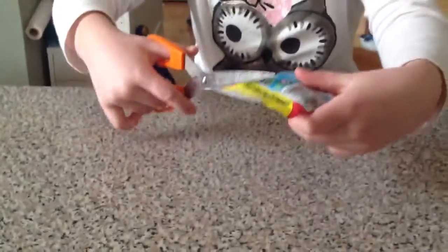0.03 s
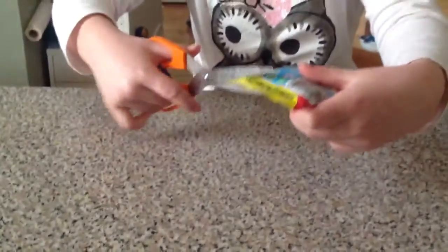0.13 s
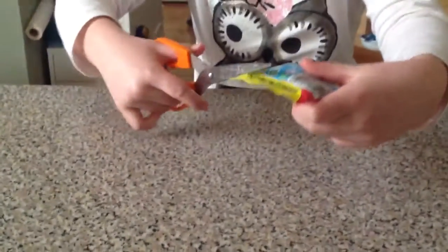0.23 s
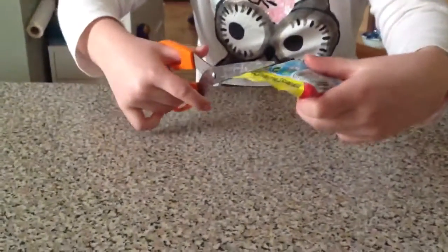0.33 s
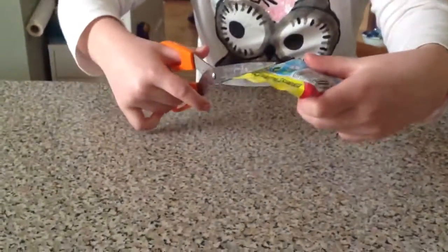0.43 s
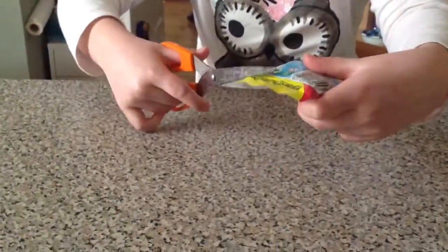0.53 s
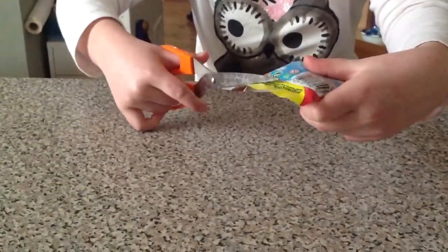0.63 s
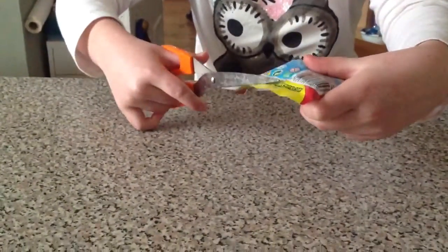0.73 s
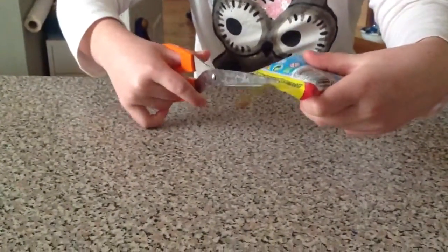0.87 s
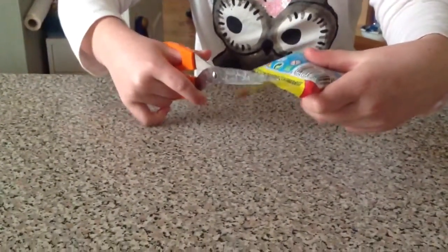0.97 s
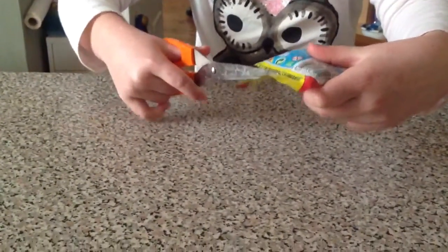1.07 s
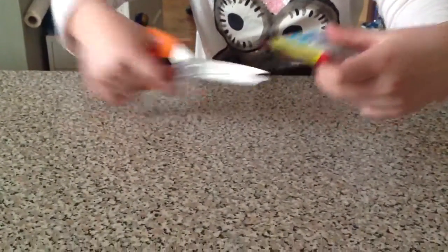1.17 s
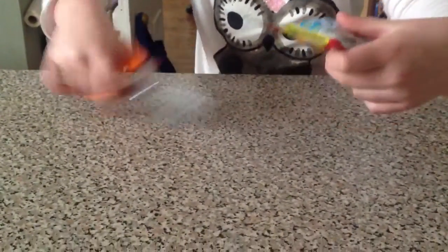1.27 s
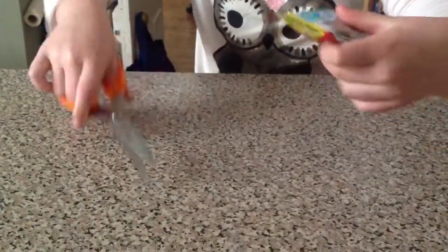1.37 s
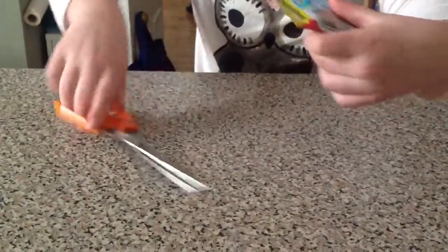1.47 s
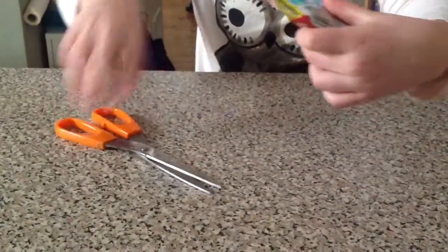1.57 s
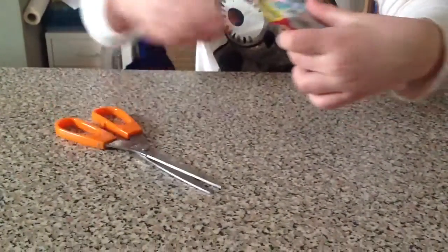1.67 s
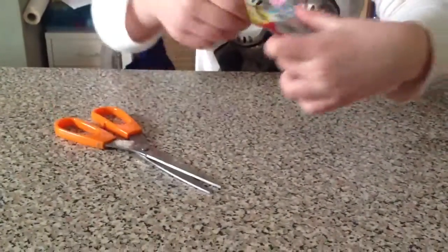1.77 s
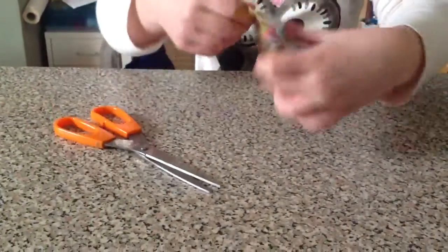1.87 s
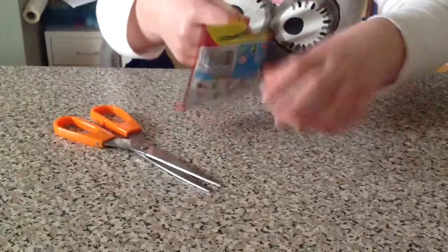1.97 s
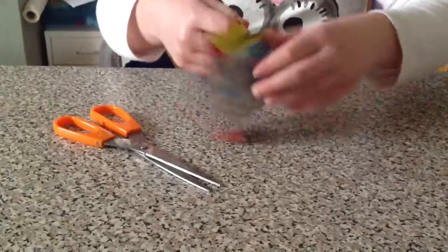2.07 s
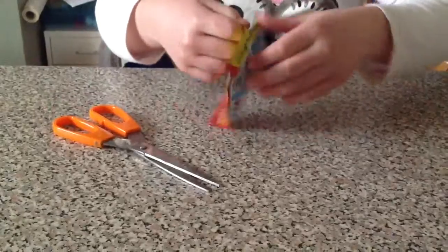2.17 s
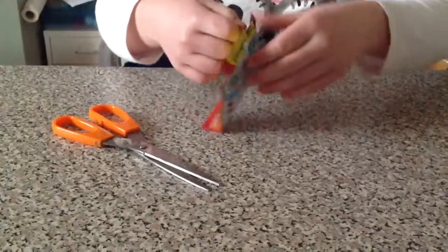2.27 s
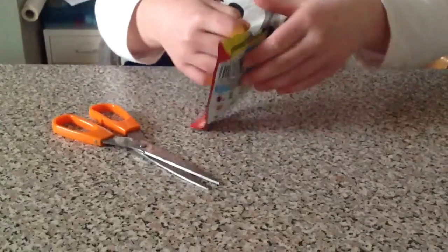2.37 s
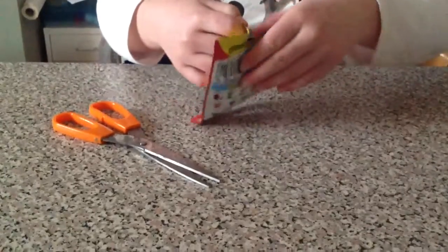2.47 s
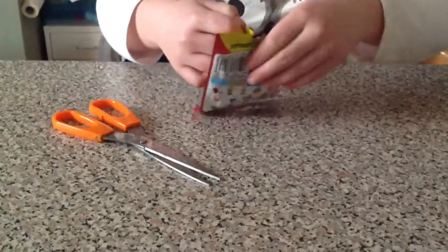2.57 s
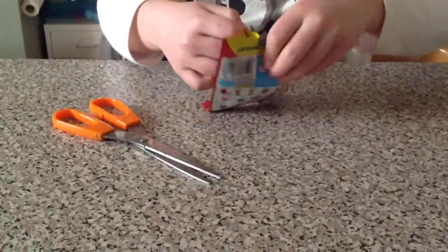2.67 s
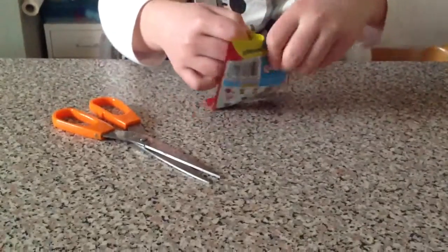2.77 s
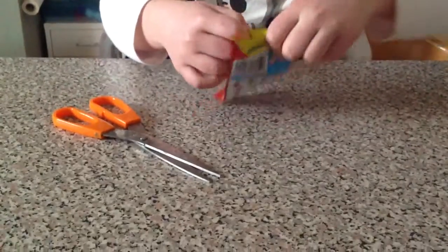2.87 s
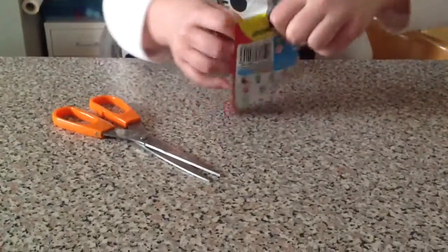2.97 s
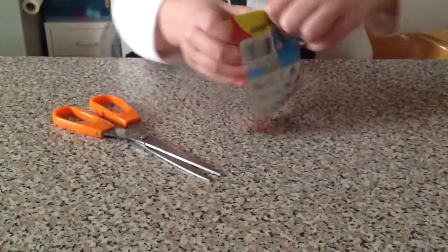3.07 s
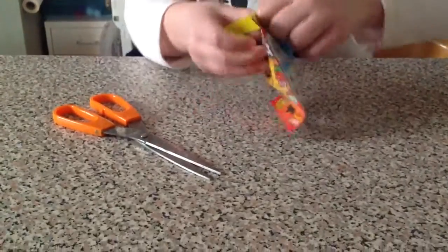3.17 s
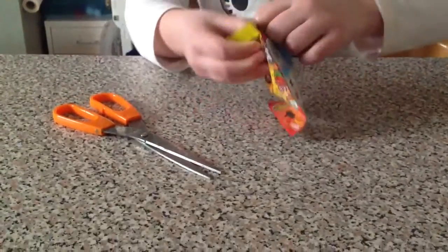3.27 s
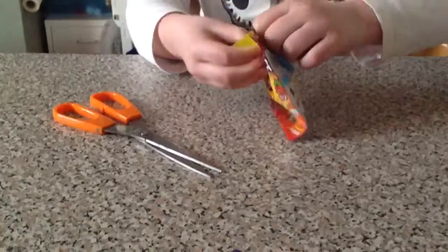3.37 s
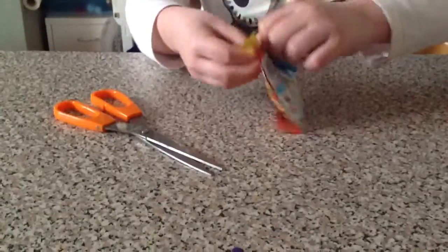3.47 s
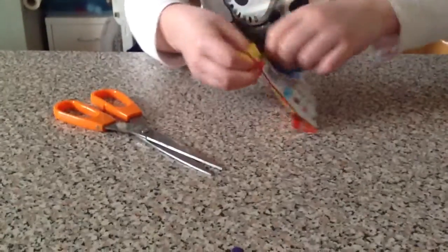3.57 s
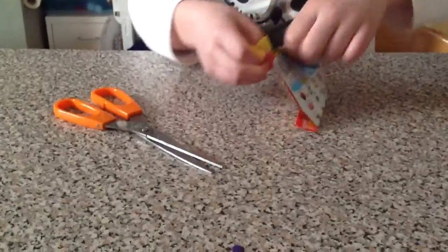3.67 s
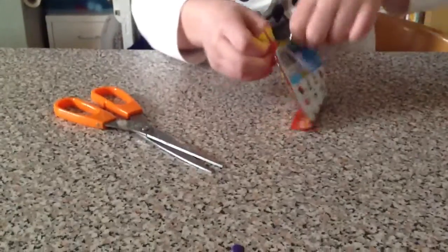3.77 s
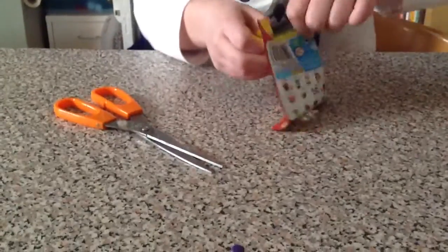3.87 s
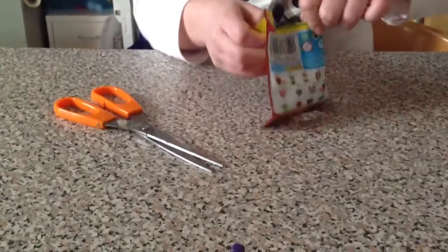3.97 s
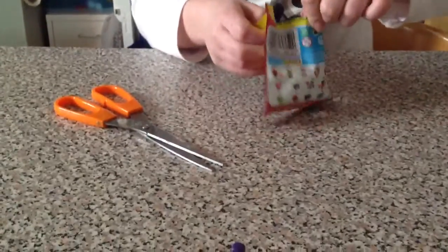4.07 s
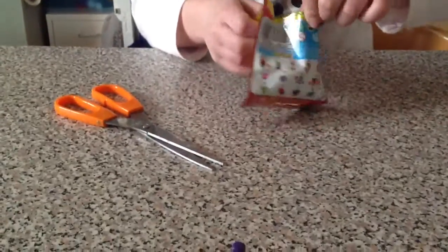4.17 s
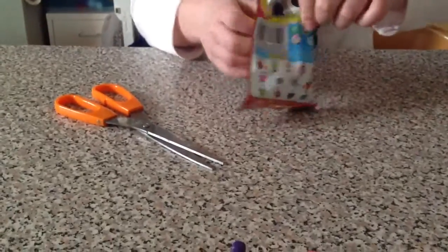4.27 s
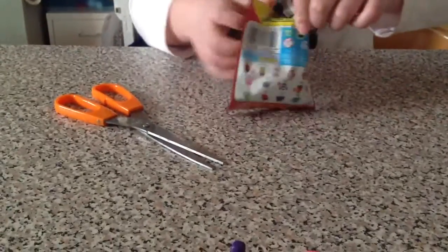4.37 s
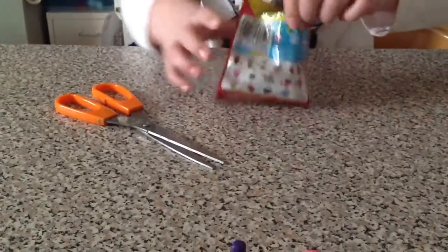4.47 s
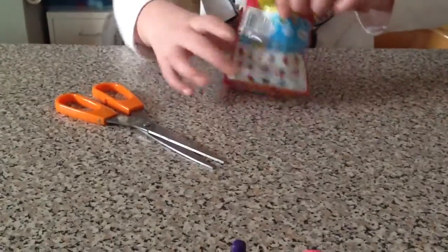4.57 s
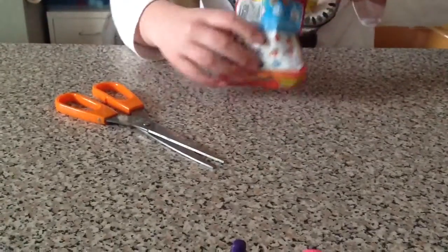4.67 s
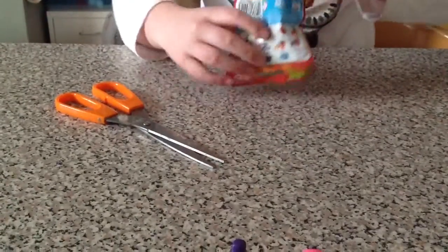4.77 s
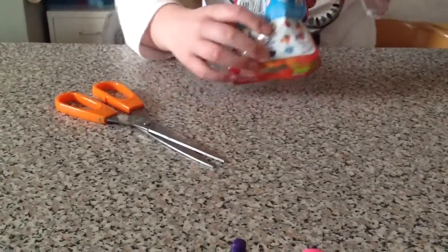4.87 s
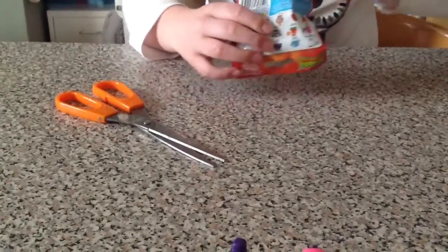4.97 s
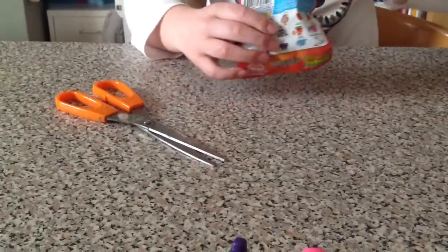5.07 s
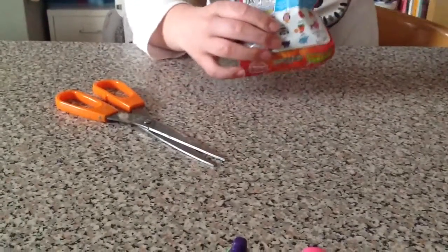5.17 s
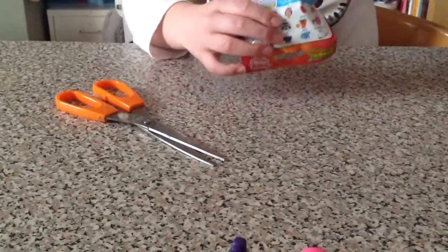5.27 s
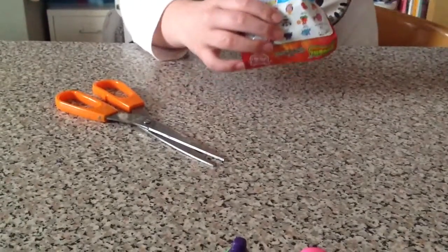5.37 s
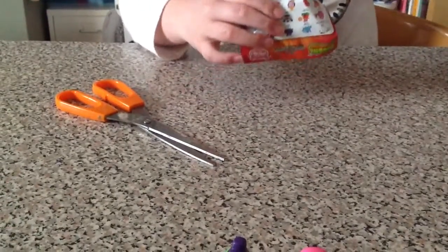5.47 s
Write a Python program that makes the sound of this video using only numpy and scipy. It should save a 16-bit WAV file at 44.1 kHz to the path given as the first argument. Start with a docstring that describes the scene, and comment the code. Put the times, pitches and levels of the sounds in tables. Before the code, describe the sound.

Close up in a hard-walled kitchen, scissor blades bite a small foil packet with irregular dry snaps and faint clinks. The scissors then drop onto the worktop with a quick metallic clatter and knocks. Fingers pull at the packet, its creases cracking one by one over fine crinkle, densest and loudest midway, then thinning out over a low steady room hum.

```python
"""Scissors snip the top off a foil packet, then are laid down with a clatter on a kitchen worktop.
Fingers pull the packet open: its creases snap one by one over a fine crinkle, and the handling dies away.
A close microphone hears each snap dry, followed by the ring of a hard-walled room with a low hum of air."""
import sys
import numpy as np
from scipy import signal
from scipy.fft import rfft, irfft
from scipy.io import wavfile
from scipy.ndimage import uniform_filter1d

SR = 44100
rng = np.random.default_rng(int(sys.argv[2]) if len(sys.argv) > 2 else 0)


def generate_wav(signal):
    """Clip the signal to [-1, 1] and save it as 16-bit WAV at the path in sys.argv[1]."""
    frames = np.transpose(np.atleast_2d(signal))
    scaled = np.clip(frames, -1, 1) * 32767
    pcm = np.round(scaled).astype(np.int16)
    wavfile.write(sys.argv[1], SR, pcm)


N = 242858

# the loud snaps of the foil, under the blades until 1.3 s and between the fingers after that:
# (s, level dB, treble dB, pitch Hz, length ms, room dB)
SNAPS = [(0.0235, -38.5, -28, 2300, 4.4, 4), (0.0439, -17.5, -15, 2480, 2.9, 0), (0.057, -25, -16, 2540, 1.47, 4), (0.0626, -25, -14, 2730, 2.1, -6),
         (0.123, -20, 2, 2780, 1.5, -4), (0.211, -33, -20, 2130, 2.6, 0), (0.339, -46, 1, 2600, 2.2, 5),
         (0.4421, -13.5, -9.5, 2430, 2.16, 1), (0.4479, -17, -3, 2550, 2.5, 1), (0.553, -26.5, -1.5, 2380, 15.2, 1.5), (0.594, -31, 0, 2530, 15, -2),
         (0.708, -24, -15, 2290, 3.75, 7), (0.7131, -22, -1.5, 2500, 9.3, -1.5), (0.762, -21.5, -9, 2040, 7.1, 3), 
         (0.833, -22.5, 2, 2350, 5.1, -10), (0.8379, -14, -6, 2300, 4.5, 4.5),
         (0.9252, -27, -31, 2320, 2.9, -15), (1.001, -39, -13, 2470, 5.2, 14.5), (1.02, -30, -15, 2270, 6.7, -4), (1.1008, -33.5, -10.5, 2280, 1.53, 6.5),
         (1.127, -35, -5, 3060, 9, 2), (1.1514, -25.5, -11, 2380, 1.92, 7.5),
         (1.79, -25, -16, 2250, 2.4, 5.5), (1.813, -24, -7, 2300, 3.3, -9), (1.8255, -24.5, -7, 2230, 1.12, 8.5), (1.86, -22, -13, 2160, 5, 2), (1.883, -21, -11, 2480, 4.3, 3.5),
         (1.981, -28, -26, 2270, 3.4, -1), (2.048, -30.5, -5, 2630, 2.3, 5.5), (2.076, -23, -13.5, 1950, 8.1, 0.5), (2.1646, -27.5, -21, 2100, 4.4, 2.5),
         (2.1907, -24, -4, 2710, 1.93, 3.5), (2.304, -40.5, -3.5, 2500, 2, 5),
         (2.473, -25.5, -15.5, 2260, 3.5, 0.5), (2.509, -25, -15.5, 2050, 10, 0.5), (2.539, -24.5, -27, 2130, 3, -7), (2.6638, -17.5, -12.5, 2220, 1.7, -3.5),
         (2.7201, -33.5, -18, 2080, 1.36, 9.5), (2.7793, -20.5, -2.5, 2640, 1.4, -2), (2.8303, -26.5, -1.5, 2740, 2.7, 3.5), (2.8677, -14, -11.5, 2530, 1, -0.5), (2.8718, -15, -16, 2620, 4.2, 0),
         (2.961, -24, -14, 2450, 4.1, 6.5), (2.9857, -20.5, -16, 2300, 0.84, -2), (3.005, -27, -21, 2300, 3.9, 6), (3.012, -19, -8, 1770, 3.2, -2.5), (3.033, -19, -7.5, 2300, 6.1, 3),
         (3.0539, -19.5, -11, 2450, 1.6, 3.5), (3.0699, -7, -8.5, 2500, 1.92, -3), (3.078, -26.5, -2, 3940, 3.1, 6),
         (3.146, -24.5, -25, 2490, 2.2, -5), (3.303, -28.5, -15, 2110, 3.04, 3),
         (3.45, -32.5, -15, 2130, 4.8, 10), (3.497, -17, -21, 2500, 3.1, 3), (3.5265, -14, -12, 2340, 6.7, 1), (3.604, -27.5, -10, 2330, 3.7, 6.5),
         (3.679, -33, -2, 2060, 3.1, -5), (3.6948, -27.5, -15, 2530, 2.9, 1), (3.7396, -16.5, -45, 1980, 1.23, -0.5), (3.758, -33.5, 10.5, 2570, 10.4, -2),
         (3.7899, -15.5, -24, 3130, 3.1, 0), (3.7981, -13, -11.5, 2600, 1.3, -8), (3.8094, -23, -10, 2750, 1.6, -6),
         (3.842, -18, -5, 2100, 2.6, -0.5), (3.9344, -21.5, -21, 2500, 3.2, -12), (3.946, -38, 1, 2800, 1.1, -2), (3.9546, -14.5, -11, 2180, 2.2, -4), (3.973, -22, -15, 2560, 2, -7), (4.008, -28, -16, 2110, 1.2, -7),
         (4.0192, -18, -3.5, 2550, 2.6, 0), (4.022, -11.5, -13, 2520, 2.6, -6.5), (4.0864, -14, -7, 2330, 2.5, -1.5), 
         (4.093, -28, -6, 4750, 7.4, 4), (4.2214, -28.5, -6.5, 2540, 1.7, 3.5),
         (4.3405, -25, -22, 2140, 2.9, 2.5), (4.366, -19, -12, 2410, 3.1, -1), (4.4025, -28.5, -5.5, 2480, 2.1, -0.5), (4.5, -44.5, -2.5, 2520, 7.9, 13),
         (4.598, -36, -21, 2450, 2.35, -1),
         (4.631, -35.5, -12, 2300, 3.4, 9), (4.6384, -22.5, -15.5, 2640, 1.79, 1.5), (4.8323, -32.5, -34, 2060, 1.7, 0), (4.847, -36, -38, 2220, 10.5, -0.5), (5.0138, -28, -25, 2050, 2.16, -1)]
# scissors touching down and rattling on the worktop: (s, level dB, treble dB, length ms, room dB)
KNOCKS = [(1.3923, -31.5, 9.5, 1.3, -4), (1.4287, -39, 2, 3.2, -5.5), (1.4657, -10, -5.5, 3.8, -0.5), (1.4916, -19, -23, 5.3, -22),
          (1.516, -37, -21, 3, -9), (1.527, -7.5, -10, 3.6, 2.5), (1.547, -17.5, -4, 2.7, 7), (1.552, -14, -24, 6, -1), (1.565, -11.5, -19, 5.2, -2), (1.5902, -7.5, -24, 11, -2.5),
          (1.604, -30, -3, 2, -1), (1.611, -25.5, -9.5, 4.4, 13), (1.628, -37, -39, 9.1, -18), (1.646, -24, -8, 7.9, 1)]
# modes of the scissors, the lowest ones shared with the worktop: (Hz, dB, t60 s)
STEEL = [(213, -14.5, .12), (364, -13, 0.43), (512, -12.5, 0.08), (1620, -12, 0.039), (1850, 0, 0.2), (2070, -20, 0.037), (2558, 9, 0.082), (2830, -6, 0.045),
         (3650, 3, 0.05), (4550, -3, 0.045), (6300, -8, 0.073), (7600, -6, .025), (11200, -13, 0.032), (10940, 2, 0.023)]
# colour of the room's ring, per Hz: (Hz, dB)
ROOM_COLOUR = [(100, -1.5), (400, 0.5), (1000, -1), (1700, -0.5), (2500, -3.5), (4000, 3), (6000, 4), (10000, -6.5), (15000, 3)]
# (Hz, t60 s)
ROOM_DECAY = [(150, 0.55), (1000, 0.53), (3000, 0.55), (6000, 0.45), (10000, 0.4), (15000, 0.28)]
# steady air of the room and hiss, per Hz: (Hz, dB)
AIR = [(30,-42), (70,-30), (135,-15.5), (195,-2), (290,-3), (420,-12), (700,-17), (1800,-20.5), (3500,-23), (5000,-26), (5900,-33.5), (9500,-35.5), (11500,-28), (15000,-24)]
AIR_DB = -52.5
TOP_HZ = 15500  # fixed
TIME = np.arange(N) / SR
# dull bumps of scissors and packet on the worktop: (s, dB)
BUMPS = [(1.5226, -40), (2.87, -63), (3.071, -53), (4.365, -61)]
# sounds that start in different places take different paths round the room
PATHS = np.arange(5)  # fixed
KNOCK_HZ, KNOCK_BODY_DB, THUD_DB = 2220, -6.5, -12.5
RING_DB, RING_DAMPING_DB_PER_S = -9, 100  # the steel rings less as the blades settle flat
# spells in which the hands work the packet: (start s, end s, crinkle dB)
GRIPS = [(0.0, 0.11, -54.5), (0.504, 0.62, -50.5), (0.895, 1.22, -56), (1.712, 1.883, -42), (2.157, 2.207, -52.5), (2.463, 3.047, -51), (3.447, 3.657, -45), (3.855, 3.995, -45.5), (4.3, 4.65, -51.5)]
GRIP_ATTACK_S, GRIP_RELEASE_S, HOLDING_DB = 0.03, 0.11, -73  # between spells the packet is only held
# a typical snap; weaker, longer and lower ones come from slacker foil, which sounds more hollow
TYPICAL_DB, TYPICAL_HZ, TYPICAL_MS = -22, 2400, 3  # fixed
BODY_DB, BODY_DB_PER_DB, BODY_DB_PER_DOUBLING, BODY_DB_PER_OCTAVE = -11, -0.13, 2.5, -7
FOIL_HZ = None
FOIL_HZ_PER_DB = None
FOIL_HZ_PER_TREBLE_DB = None
TYPICAL_TREBLE_DB = None
STIR_DB, STIR_S = -27, 0.013  # every snap shakes loose more wrinkles, in proportion to its strength
# faint steady whines in the hiss: (Hz, width Hz, dB)
WHINES = [(2680, 66, 5), (3310, 100, 4), (3930, 70, -3), (4850, 160, -1)]
CUT_END_S = 1.3  # fixed
SNIP_RING_DB, SNIP_THUD_DB = -12, -20.5  # each bite of the blades also jolts the scissors


def undb(db):
    """Decibels to gain."""
    return 10 ** (np.asarray(db) / 20)


def unit(x):
    """Scale to the energy of one millisecond at full level."""
    return x / np.sqrt(np.sum(x ** 2) * 1000 / SR + 1e-18)  # fixed


def add(out, s, x):
    """Mix x into out from time s."""
    i = int(s * SR)
    out[i:i + len(x)] += x[:N - i]


def on_log(points, hz):
    """Read (Hz, value) points on a log-frequency axis."""
    f, value = np.transpose(points)
    return np.interp(np.log(hz + 1e-9), np.log(f), value)


def coloured(x, points):
    """Give x the spectrum of (Hz, dB) points."""
    return irfft(rfft(x) * undb(on_log(points, np.fft.rfftfreq(len(x), 1 / SR))), len(x))


def band(x, lo_hz, hi_hz, order=2):
    """Causal band-pass."""
    return signal.sosfilt(signal.butter(order, [lo_hz, min(hi_hz, SR / 2 - 100)], 'band', fs=SR, output='sos'), x)


def resonance(x, hz, width_hz):
    """One damped resonance, gain 1 at its centre."""
    return signal.lfilter(*signal.iirpeak(hz, hz / width_hz, SR), x)


def avalanche(ms, clicks_per_s=4000, follow=.4, fade=.55, scatter=.3, scatter_s=.0007, even=1.0, size=45):
    """One slip sets off a dying run of smaller ones, about ms long; waves scatter off nearby edges."""
    t = TIME[:4096]
    chance, sizes, edges = rng.random(len(t)), rng.standard_normal(len(t)), rng.standard_normal(256)
    length_s = fade * max(ms, 1 / 2) / 1000  # fixed
    run = follow * sizes * (chance < clicks_per_s / SR) * np.exp(-(t / length_s) ** 2)
    run[0] = 1
    spread = scatter * edges * np.exp(-t[:256] / scatter_s)
    spread[0] = 1
    # even out the run's spectrum: its colour comes mostly from the surface that it strikes
    spectrum = rfft(np.convolve(run, spread)[:len(t)])
    tint = np.sqrt(uniform_filter1d(np.abs(spectrum) ** 2, size) + 1e-9)
    return irfft(spectrum / tint ** min(even, 1))[:2048]


def sheet(push, low_db, treble_db, hz, width_hz, gap_hz=5900, gap_db=-5):
    """A struck surface: a hollow body, a strong short mid resonance and, beyond a gap, a crisp top."""
    hollow = band(push, 424, 1160, order=2)
    body = hollow + undb(3) * resonance(hollow, 1084, width_hz=380) + undb(-6) * resonance(hollow, 550, width_hz=65)
    mid = band(resonance(push, hz, width_hz), 1340, 4030, order=2)
    crisp = band(push, 4950, 13900, order=3)
    top = crisp + undb(-1.0) * resonance(crisp, 10720, width_hz=560) + (undb(gap_db) - 1) * resonance(crisp, gap_hz, width_hz=570)
    return undb(low_db) * unit(body) + unit(mid) + undb(treble_db) * unit(top)


def foil(own=0.57):
    """Creases buckle; each faces another way, so each sends its own share into the room by its own path."""
    near, far = np.zeros(N), np.zeros((len(PATHS), N))
    for k, (s, db, treble_db, hz, ms, room_db) in enumerate(SNAPS):
        low_db = hollowness(db, hz, ms)
        push = avalanche(ms, clicks_per_s=4500, follow=0.66, fade=1.19, scatter=0.36, scatter_s=0.0004)
        snap = undb(db) * sheet(push, low_db, treble_db, hz, width_hz=540)
        add(near, s, snap)
        # near walls return the snap's own colour; the rest of the room blends all directions
        add(far[(k + 1) % len(PATHS)], s, own * undb(room_db) * snap)
        middle = s + ms / 2000  # fixed
        add(far[k % len(PATHS)], middle, undb(db + room_db - 6.0) * all_round(low_db, treble_db, hz))
    return near, far


def crinkle(ticks_per_s=120, spread_db=7.5, pitch_spread=0.242, tick_s=0.0021, body_db=-12, treble_db=-9, count=900):
    """Tiny wrinkles tick at random while the packet is worked, each with its own size and colour."""
    out = np.zeros(N)
    chance = np.clip(rng.standard_normal((count, 3)), -1.7, 1.7)  # fixed
    sizes = np.minimum(rng.exponential(size=count), 3)
    times = np.cumsum(rng.exponential(size=count)) / ticks_per_s
    t = TIME[:256]
    for s, size, (pitch, top, low) in zip(times, sizes, chance):
        if s < TIME[-1]:
            mid = np.sin(2 * np.pi * 2450 * np.exp(pitch_spread * pitch) * t)
            body = undb(body_db + 6 * low) * np.sin(2 * np.pi * 900 * np.exp(pitch_spread * top) * t)  # fixed
            crisp = undb(treble_db + 6.7 * top) * rng.standard_normal(len(t)) * np.exp(-t / 0.001)
            add(out, s, undb(spread_db * size) * ((mid + body) * np.exp(-t / tick_s) + crisp))
    return band(out, 290, 9300) / np.std(out) * handling()


def scissors():
    """Blade tips land first and ring; the handles follow, knock on the worktop and rattle to rest."""
    near, far = np.zeros(N), np.zeros((len(PATHS), N))
    for k, (s, db, treble_db, ms, room_db) in enumerate(KNOCKS):
        path = far[k % len(PATHS)]
        push = avalanche(ms, clicks_per_s=3900, follow=0.68, fade=0.99, scatter=0.21, scatter_s=0.00085)
        add(near, s, undb(db) * sheet(push, KNOCK_BODY_DB, treble_db, KNOCK_HZ, width_hz=1000))
        add(path, s, undb(db + room_db) * all_round(KNOCK_BODY_DB, treble_db, KNOCK_HZ))
        thud = undb(db + KNOCK_BODY_DB + THUD_DB) * unit(band(push, 177, 840, order=3))
        ring_db = RING_DB - RING_DAMPING_DB_PER_S * (s - KNOCKS[0][0])
        for part in (thud, undb(ring_db) * blades()):
            add(near, s, part)
            add(path, s, undb(room_db) * part)
    return near, far


def room(x, gap_s=0.0024, build_s=0.00085, early=1.0, early_s=0.014):
    """Separate reflections from near surfaces thicken into a tail whose treble dies first."""
    t = TIME[:SR]
    reflections = rng.standard_normal(SR) * (1 + early * 4 * (rng.random(SR) < .01) * np.exp(-t / early_s))
    spectrum, f = rfft(reflections), np.fft.rfftfreq(SR, 1 / SR)
    onset = 1 - np.exp(-np.maximum(t - gap_s, 0) / build_s)
    edges = [0, 300, 700, 1500, 3000, 4500, 6500, 9000, 12000, SR / 2]  # fixed
    tail = 0
    for lo, hi in zip(edges, edges[1:]):
        decay = onset * np.exp(-np.log(1000) * t / on_log(ROOM_DECAY, (lo + hi) / 2))
        part = spectrum * (f >= lo) * (f < hi) * undb(on_log(ROOM_COLOUR, f))
        tail = tail + irfft(part, SR) * decay / np.sqrt(np.sum(decay ** 2))
    return signal.fftconvolve(x, tail)[:N]


def air():
    """Low steady hum of the room under a thin hiss with faint whines."""
    noise = coloured(rng.standard_normal(N), AIR)
    noise = noise + sum(undb(db) * resonance(noise, hz, width_hz) for hz, width_hz, db in WHINES)
    return undb(AIR_DB) * noise / np.std(noise)


def worktop(push_s=0.0042):
    """The heavy slab passes on a short, deep bump."""
    out, t = np.zeros(N), TIME[:4096]
    for s, db in BUMPS:
        add(out, s, undb(db) * unit(band(np.exp(-t / push_s), 35, 240, order=2)))
    return out


def all_round(low_db, treble_db, hz):
    """What the room gathers from every direction: the fine colour of a single snap averages out."""
    return sheet(signal.unit_impulse(4096), low_db, treble_db, hz, width_hz=1300)


def blades(mismatch=0.0061, loose=0.003, clank=0.25, clank_s=0.018, chatter=0.81, size=220):
    """Two nearly equal blades beat and chatter against each other; the hand soaks up the first clank."""
    t, ring = TIME[:6000], 0
    for (hz, db, t60), (share, shift, pair) in zip(STEEL, rng.standard_normal((len(STEEL), 3))):
        # every contact favours other modes, and the loose pivot shifts them a little
        centre, split = hz * (1 + loose * shift), mismatch * pair
        both = np.cos(2 * np.pi * centre * (1 + split) * t) + np.cos(2 * np.pi * centre * (1 - split) * t)
        flutter = 1 + chatter * np.sqrt(size) * uniform_filter1d(rng.standard_normal(len(t)), size, mode='wrap')
        ring = ring + undb(db + 3.2 * share) * both * flutter * np.exp(-np.log(1000) * t / t60)
    return unit(band(ring * (1 + clank * np.exp(-t / clank_s)), 130, 13500, order=3))


def handling():
    """How hard the foil is worked: each grip tightens, holds and relaxes, and each snap stirs it briefly."""
    effort = np.full(N, undb(HOLDING_DB))
    for start, end, db in GRIPS:
        outside = np.maximum(start - TIME, 0) / GRIP_ATTACK_S + np.maximum(TIME - end, 0) / GRIP_RELEASE_S
        effort = effort + undb(db) * np.exp(-outside)
    for s, db, *_ in SNAPS:
        add(effort, s, undb(db + STIR_DB) * np.exp(-TIME[:8192] / STIR_S))
    return effort




def hollowness(db, hz, ms):
    """Level (dB) of the packet's hollow body in a snap, from its strength, pitch and length."""
    doublings = np.log2(max(ms / TYPICAL_MS, 1 / 10))
    return BODY_DB + BODY_DB_PER_DB * (db - TYPICAL_DB) + BODY_DB_PER_DOUBLING * doublings + BODY_DB_PER_OCTAVE * np.log2(hz / TYPICAL_HZ)


def snips():
    """While they cut, the scissors give a faint clink and a soft thud with every bite."""
    out = np.zeros(N)
    for s, db, *_ in SNAPS:
        if s < CUT_END_S:
            thud = unit(band(signal.unit_impulse(6000), 290, 620, order=2))
            add(out, s, undb(db) * (undb(SNIP_RING_DB) * blades() + undb(SNIP_THUD_DB) * thud))
    return out


def scene():
    """Foil and scissors close by, the room behind them."""
    (foil_near, foil_far), (steel_near, steel_far) = foil(), scissors()
    small = crinkle() + snips()
    echoes = sum(room(path) for path in foil_far + steel_far)
    echoes = echoes + undb(-5) * room(small)  # fixed
    return (foil_near + steel_near + small + worktop() + echoes + air())[None]


def record(dry):
    """The microphone thins the deep bass and cuts the top."""
    thin = signal.sosfilt(signal.butter(1, 40, 'high', fs=SR, output='sos'), dry)
    return signal.sosfilt(signal.ellip(10, .2, 70, TOP_HZ, fs=SR, output='sos'), thin)


dry = scene()
out = record(dry)
generate_wav(out)
```